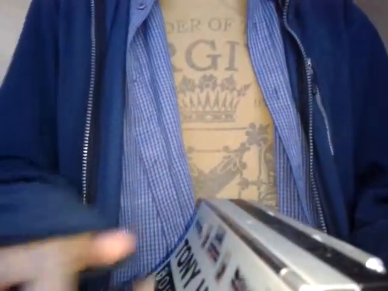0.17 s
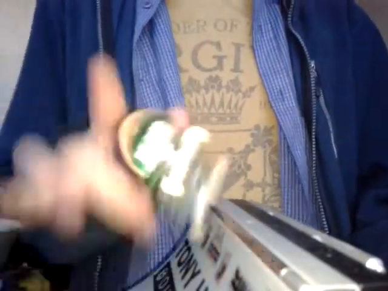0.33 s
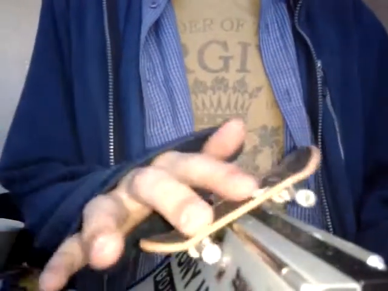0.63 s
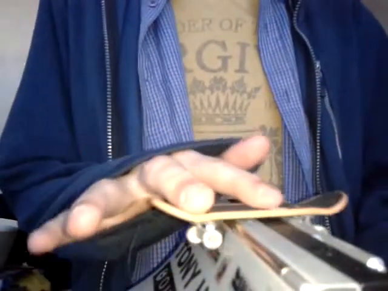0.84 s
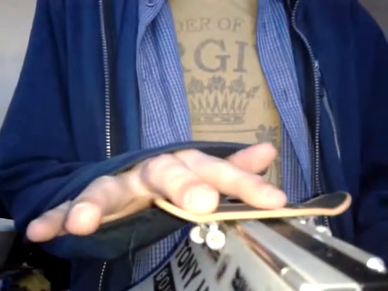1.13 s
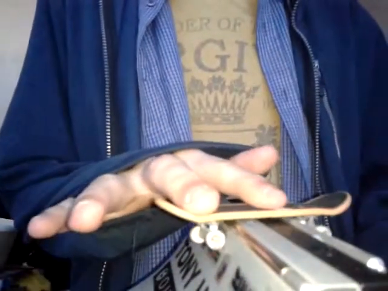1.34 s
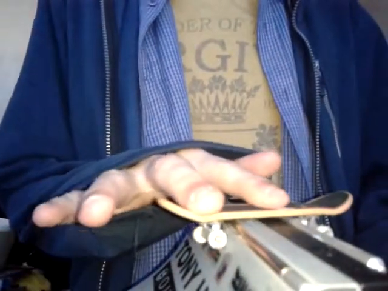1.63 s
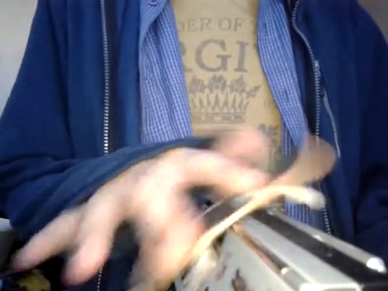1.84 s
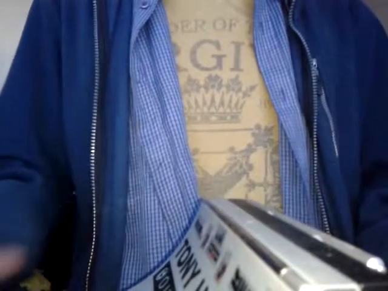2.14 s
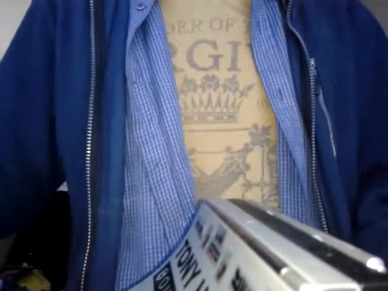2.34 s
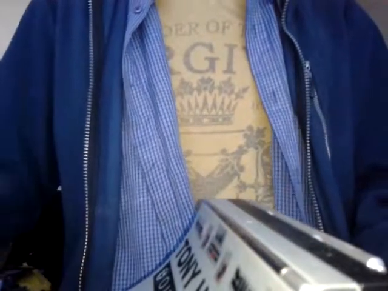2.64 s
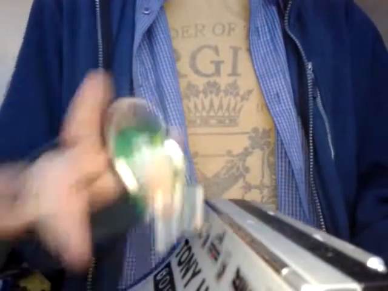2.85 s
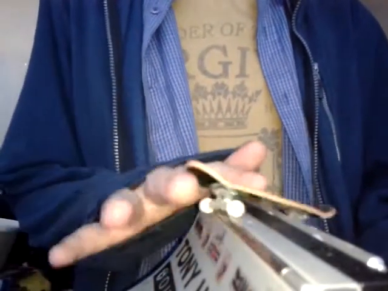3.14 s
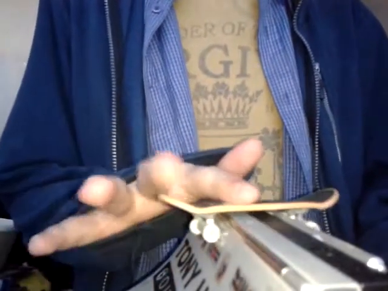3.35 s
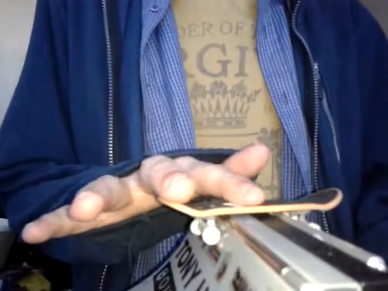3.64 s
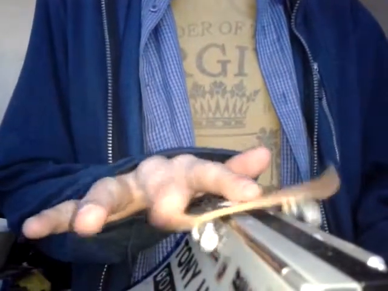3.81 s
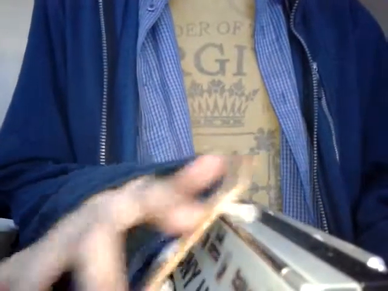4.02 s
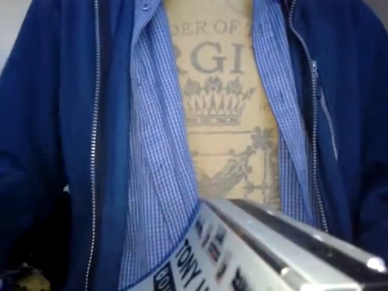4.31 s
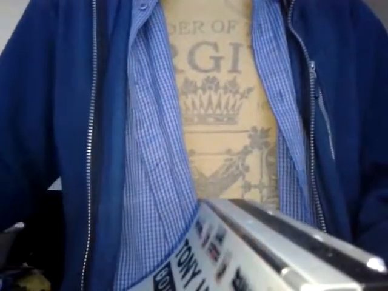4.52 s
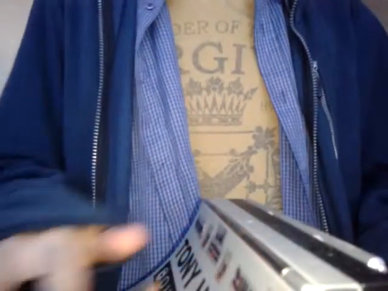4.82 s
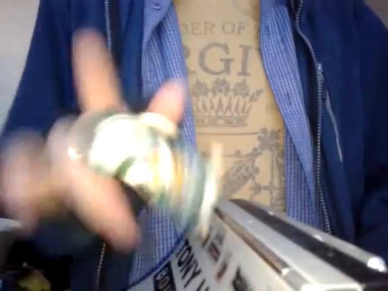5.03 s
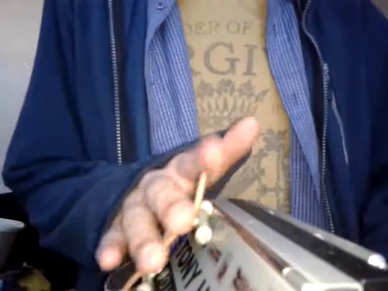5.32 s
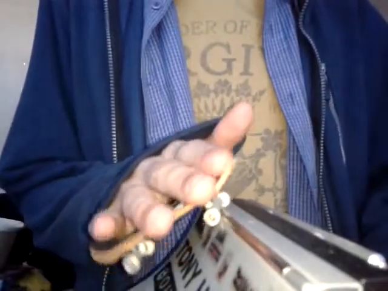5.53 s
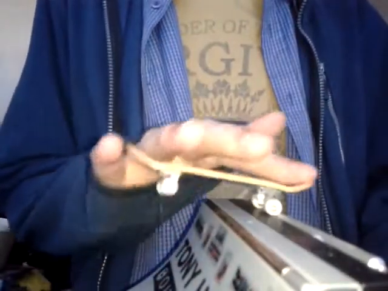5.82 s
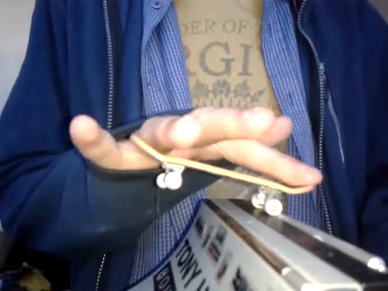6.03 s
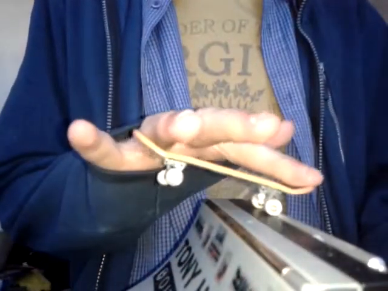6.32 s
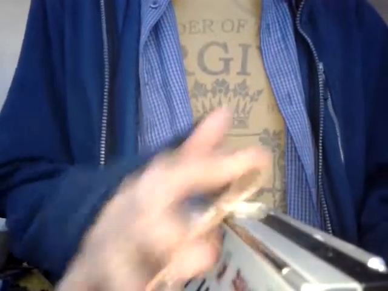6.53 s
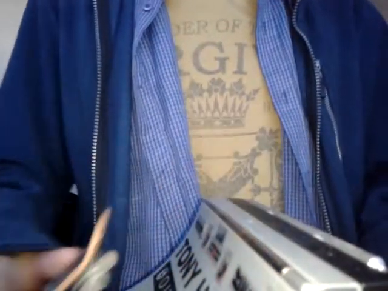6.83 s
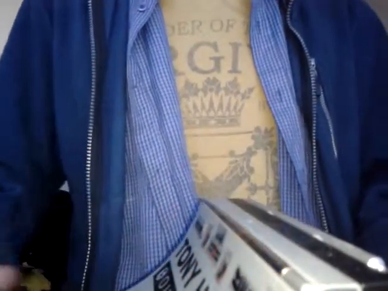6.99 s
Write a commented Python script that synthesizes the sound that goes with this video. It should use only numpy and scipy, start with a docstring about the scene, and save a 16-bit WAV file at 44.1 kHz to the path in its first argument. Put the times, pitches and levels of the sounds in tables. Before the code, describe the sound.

A finger-sized skateboard on a small hollow ramp, very close to a cheap microphone in a quiet humming room. Gritty rolling swells into hard clacks and rattles, then stops for about a second. It drops back with louder clatter and rolling, lands again, pauses briefly, and repeats. Soft ticks and scuffs mark the board being set on the lip; the loudest knocks clip.

```python
"""Over a quiet room hum, hard little wheels grind along a small hollow ramp, then clack again and again.
It is a toy skateboard pushed up and down on a table, close to a laptop microphone. Random grit makes the
ramp's modes (its natural pitches) ring; each clack is a first contact and a short rattle that rings the
same modes and the metal parts. Soft thumps, scuffs, single ticks, a singing metal lip and a deep rumble
join in. Noise echoes add the nearby surfaces, and the loudest blows overload the input."""
import sys
import numpy as np
from scipy import signal
from scipy.fft import rfft, irfft
from scipy.io import wavfile

SR = 44100
rng = np.random.default_rng(int(sys.argv[2]) if len(sys.argv) > 2 else 0)


def to_wav(sig):
    """Store sig (one row per channel, or 1-D mono) as 16-bit WAV at the path in sys.argv[1].

    Samples outside -1..1 are clipped; the rate is SR.
    """
    pcm = np.clip(np.atleast_2d(sig), -1, 1) * 32767
    pcm = np.round(pcm).astype(np.int16)
    wavfile.write(sys.argv[1], SR, pcm.T)  # frames by channels


def field_ratio(decibels):
    """Amplitude ratio for a level in dB (20 dB per decade); scalars and array-likes work."""
    return 10 ** (np.asarray(decibels, dtype=float) / 20)


N = 315756

# All event and mode levels are relative; the functions below balance them against each other.
# Noise colours: pitch_hz, relative level_db (per Hz)
ROOM_TONE_COLOUR = [(24, -40), (40, -1.5), (75, -9), (106, -6), (120, -10.5), (143, -3), (235, -7.5),
                    (334, -18), (498, -16.5), (724, -22), (1820, -27), (2230, -27), (6040, -29.5),
                    (15500, -34.5), (15900, -59.5)]
HISS_COLOUR = [(1530, -42), (2600, -15), (2850, -3), (3070, -7.5), (3720, -7.5), (4070, -8.5), (7090, -8.5),
               (9990, -21.5), (12000, -35), (16000, -102.5)]
CRACK_COLOUR = [(1530, -19.5), (2600, 2), (2910, -4), (5190, 2.5), (8380, 0), (9910, -12.5), (10300, -7),
                (14900, -17.5), (16000, -33.5)]
ROOM_TONE_DB = -59

# Deep rumble as the table is leaned on: peak_s, level_db, rise_s, fall_s
LEANS = [(2.75, -42, 0.08, 0.27), (3.5, -43, .15, 0.14), (4.54, -47, .1, 0.13), (5.13, -45, 0.081, 0.17),
         (5.35, -47, .15, 0.27), (5.65, -42, 0.296, 0.27), (6.25, -48, 0.17, 0.17),
         (6.7, -46.5, 0.088, 0.38)]
# Rolling and sliding strokes; the wheels' place on the ramp favours the modes near a gliding pitch:
# full_speed_s, level_db, rise_s, fall_s, favoured_hz
STROKES = [(0.029, -26.5, 0.15, 0.28, 595), (0.15, -18.5, 0.25, 0.2, 704.5), (0.32, -21, 0.087, 0.14, 830),
           (0.399, -18.5, 0.22, 0.024, 875), (1.935, -19, 0.049, 0.031, 1051),
           (2.069, -16.5, 0.13, 0.15, 889), (2.19, -27, 0.18, 0.077, 535), (2.3, -14.5, 0.22, 0.14, 597),
           (2.38, -23, 0.17, 0.019, 741), (2.46, -52, 0.045, 0.054, 597), (2.52, -40.5, 0.038, 0.086, 522),
           (2.635, -25, 0.11, 0.1, 540), (2.701, -24, 0.47, 0.24, 560), (2.775, -15, 0.26, 0.12, 741),
           (2.845, -13, 0.048, 0.054, 764), (2.899, -27.5, 0.028, 0.068, 762.4),
           (4.041, -26.5, 0.045, 0.13, 718), (4.135, -15, 0.12, 0.17, 1020), (4.25, -21.5, 0.15, 0.14, 513),
           (4.33, -19, 0.22, 0.22, 680), (4.413, -21, 0.21, 0.09, 807), (4.47, -31, 0.046, 0.031, 819),
           (4.575, -34, 0.015, 0.18, 593), (4.66, -24, 0.11, 0.2, 554), (4.73, -20.5, 0.19, 0.37, 700),
           (4.819, -21, 0.3, 0.13, 695), (4.93, -30.5, 0.082, 0.25, 620), (5.02, -14, 0.05, 0.083, 884),
           (6.78, -24, 0.067, 0.063, 829), (6.86, -23.5, 0.1, 0.091, 812), (6.96, -22.5, 0.2, 0.037, 730),
           (7.06, -25, 0.094, 0.12, 705), (7.15, -23.5, 0.15, .1, 704)]
# Deck and fingers scuff as the board is caught or shifted:
# full_speed_s, level_db, rise_s, fall_s, favoured_hz
SCUFFS = [(0.56, -28, 0.11, 0.2, 690), (0.7, -53, .08, 0.16, 596), (3.05, -30, 0.051, 0.18, 615),
          (3.17, -40.5, 0.066, 0.11, 671), (3.27, -34.5, 0.026, 0.073, 653), (3.33, -42, 0.084, 0.11, 654),
          (3.92, -51.5, 0.17, 0.28, 712), (5.3, -34.5, 0.16, 0.089, 662), (5.37, -39, 0.051, 0.052, 642),
          (5.5, -54.5, 0.26, 0.37, 955), (5.67, -40.5, 0.075, 0.27, 600), (5.72, -43, 0.1, 0.024, 615),
          (5.8, -49.5, 0.062, 0.14, 648), (6.639, -28.5, 0.045, 0.13, 720)]
# Wheels, axles and deck hit seams and lip: start_s, level_db, crack_db (relative to level_db), pitch_hz,
# chatter_db (strength of the rattle against the first contact)
CLACKS = [(0.121, -2.5, -13, 656, 6.5), (0.178, -7, -7.5, 800, -4.5), (0.334, -11.5, -5, 894, -5.5),
          (0.386, -6.5, -6, 724, -7), (0.488, -12, -1, 999, 3), (0.518, -24.5, -1.5, 800, 13.5),
          (0.555, -18, -15, 900, 9.5), (0.57, 2, -11.5, 1011, 2), (0.578, -4.5, -16.5, 515.4, 5),
          (0.604, 0.5, -11, 1447, -7), (0.613, -22, -17, 519, 12.5), (0.781, -18.5, -11, 492, 2.5),
          (0.792, -20.5, -37, 504, -24), (0.873, -18.5, -29, 595, -3), (1.601, -40.5, -8.5, 1150, -2),
          (1.885, -21, -26.5, 950, 13.5), (1.945, -9.5, -9, 957, 25.5), (2.001, -5.5, -14.5, 615, 3),
          (2.023, 5.5, -19.5, 910, 22), (2.139, -1, -7.5, 606, 10.5), (2.211, -1.5, -7, 1323, -4),
          (2.735, 4, -13.5, 777, -5.5), (2.748, -7, -5, 795, 7), (2.757, -5.5, -19.5, 700, 6),
          (2.782, 3.5, -13.5, 628, -10.5), (2.797, -8, -19.5, 705, 5), (2.883, -5.5, -9.5, 1440, 16.5),
          (2.895, -8, -9, 1600, 10.5), (2.98, -42.5, 10, 535, 5.5), (3.017, -4.5, -8, 690, -4),
          (3.048, -3, -4.5, 615.5, -0.5), (3.11, -11.5, 1.5, 1488, 9.5), (3.259, -31.5, -4.5, 495, 15),
          (3.295, -12, -14, 910, 21), (3.308, -9.5, -13.5, 1370, -5), (3.428, -28, -27, 555, 15),
          (3.891, -21.5, -23, 825, -8.5), (3.928, -18, -25, 523, 13), (4.043, -6.5, -6, 830, 11.5),
          (4.072, -11, -6, 1223, 4), (4.087, -9, -10, 834, 12), (4.209, 2.5, -10.5, 473, 11.5),
          (4.284, -9, -3, 502, 11), (4.762, -3, -9.5, 716, 15.5), (4.824, -2.5, -16, 838, 2),
          (5.182, -39, 11, 2300, 8.5), (5.2, 1.5, -8.5, 1386, -1), (5.211, -8.5, -9.5, 2007, 11),
          (5.226, 7, -12.5, 1209, 9.5), (5.237, -1, -16, 565, 0), (5.645, -34, -5, 770, 8),
          (5.701, -17, -8, 501, 9.5), (5.711, -16.5, -30, 522, -1), (5.755, -5.5, -20.5, 766, -1),
          (5.86, -34.5, -28, 610, -9), (6.521, -47.5, -35.5, 700, 18), (6.594, -8, -8, 606, 9.5),
          (6.614, 2, -15.5, 1112, 5.5), (6.641, -6.5, -11, 517, -7), (6.744, -17.5, -13, 1080, 10),
          (6.767, -15, -5.5, 814, -12), (6.815, -25, -7.5, 899, 12), (6.939, -5, -2, 2277, 2),
          (7.016, 3.5, -8.5, 1620, 4.5), (7.099, -14.5, 0.5, 589, 3)]
# The weight of the hand comes down through the ramp into the table: start_s, level_db, pitch_hz
THUMPS = [(0.121, -5, 310.4), (0.183, -9.5, 334), (0.338, -14, 264.5), (0.488, -13.5, 380),
          (0.571, -5, 262), (0.605, -15, 205.2), (0.793, -24.5, 366), (0.875, -30, 219),
          (0.928, -38.5, 262.3), (1.603, -43, 366), (1.882, -24.5, 164), (1.947, -14.5, 285),
          (2.001, -11.5, 264.7), (2.14, -10, 300.6), (2.212, -12, 307), (2.734, -4, 322.2),
          (2.781, -6.5, 307), (2.86, -23.5, 112.1), (3.017, -16, 355.4), (3.049, -16.5, 154.6),
          (3.112, -25, 370), (3.231, -19.5, 380), (3.306, -18, 164), (3.89, -31.5, 155.3),
          (3.929, -29, 162), (4.042, -15, 162.5), (4.084, -10, 253), (4.206, -8, 316), (4.279, -12.5, 299),
          (4.765, -7, 316), (4.822, -10, 334), (5.2, -13, 361), (5.222, -20.5, 376.7), (5.701, -17, 283),
          (5.754, -15.5, 370), (6.613, -11, 355), (6.641, -14.5, 292), (6.768, -19, 326),
          (6.936, -14.5, 366.4), (7.016, -11, 307), (7.098, -17.5, 109)]
# Clean single ticks of a wheel set down: start_s, level_db, top_hz (higher is harder), pitch_hz
TICKS = [(0.874, -37, 2406, 1316), (3.232, -17.5, 1400, 430), (3.454, -38, 3500, 630),
         (3.482, -36, 2500, 445), (3.51, -41.5, 2220, 440), (3.526, -21, 1480, 1480),
         (5.413, -26, 2460, 800), (5.482, -22, 3050, 515), (5.552, -29, 2750, 472),
         (5.587, -31.5, 1980, 520), (5.622, -32, 1800, 600)]
# A wheel rubs the metal lip: peak_s, level_db, rise_s, fall_s
LIP_RUBS = [(4.42, -32, 0.22, 0.067), (5.025, -27.5, 0.016, 0.0063), (6.9, -35, 0.072, 0.057)]

# Hollow ramp and the table under it: pitch_hz, level_db, ring_s (to fall 60 dB; each use shortens it)
RAMP_MODES = [(61, -12, 0.41), (106, -4, 0.32), (163, -9, 0.69), (216.7, -3, 0.11), (307, -1, 0.22),
              (325, 0.5, 0.2), (403, 9.5, 0.043), (522, -2, 0.13), (606, -0.5, 0.13), (724, -3.5, 0.17),
              (800, 1.5, 0.053), (999, 6, 0.039), (1230, 2.5, 0.018), (1341, 0, 0.099), (1456.5, -1, 0.1),
              (1606, 2.5, 0.044), (1747, -1.5, 0.054), (1948, 1, 0.021), (2146, -4.5, 0.086),
              (2265, -4, 0.068), (2420, -9.5, 0.036), (2820, -8.5, 0.045), (3300, -14.5, 0.027)]
# Metal parts ringing in each crack: pitch_hz, level_db (relative to the crack), ring_s (to fall 60 dB)
AXLE_MODES = [(5200, -25.5, 0.016), (5850, -15, 0.021), (6280, -17.5, .03), (8500, -21, .025),
              (9500, -24, 0.029)]
# Echo decay: pitch_hz, decay_s (to fall 60 dB)
ECHO_DECAY = [(100, .35), (420, .18), (1100, .12), (3000, .16), (7500, .17), (14000, .08)]
# Borders between the table thrum, panel and edge modes: border_hz
ZONE_BORDERS_HZ = [420, 1100]
# Each clack shares its crack differently among these bands: border_hz
CRACK_BORDERS_HZ = [1000, 3600, 6500, 10500, 17000]
# One value each for table thrum, panel, edge and wheel hiss: level_db, relative to a loud stroke
LAYER_DB = [-15.5, -2, -3.5, -15]
# Same four layers: share (plain number) of the stroke's distance from a loud stroke that each follows
SWING_SHARE = [.9, .95, 1.05, 1.45]
# Same four layers: level_db, relative to a scuff
SCUFF_DB = [-5, -2.5, -5, -11]

LOUD_STROKE_DB = -22
FADE_DB, FADE_SHAPE = 30, 1.5   # dB lost after the rise or fall time; power of time in that loss
EDGE_HZ, EDGE_FOLLOWS = 1520, 0.3   # favoured edge pitch when the panel's is 700 Hz; power of following
WANDER_DB, WANDERS_PER_S = 3.0, 22   # each mode swells and sinks as the wheels cross its nodes
# The wheels' load detunes each mode; panel modes are also drawn towards the favoured pitch.
SLIDE_OCTAVES, SLIDES_PER_S, PULL = 0.033, 9.5, 0.12
ROCK_DB, ROCK_S = -14.5, 0.043   # thrum gain against the thump; time to fall to 37 percent
THUD_DB, THUD_DB_PER_OCTAVE = -20.5, -3   # table thud against a 700 Hz clack; change per octave above it
CHATTER_RISE_S = 0.00018   # time for loose parts to join at 0 dB chatter; stronger chatter takes longer
LIP_HZ, LIP_RING_S = 792, 0.3


def at_hz(points, hz):
    """Read a pitch table, spacing pitches as the ear does (on a log scale)."""
    table = np.array(points)
    return np.interp(np.log(hz + 1), np.log(table[:, 0]), table[:, 1])


def rms_one(x):
    """Scale to an average strength (rms) of 1."""
    return x / np.sqrt(np.mean(x ** 2) + 1e-20)


def cut(x, hz, kind, order):
    """Keep the low, high or band part with a smooth Butterworth filter."""
    return signal.sosfilt(signal.butter(order, hz, kind, fs=SR, output="sos"), x)


def colour(x, spectrum):
    """Colour a sound so white input keeps its rms; minimum phase, so nothing sounds early."""
    size = 8192
    log_gain = at_hz(spectrum, np.arange(size // 2 + 1) * SR / size) * np.log(10) / 20
    cepstrum = irfft(log_gain)
    # Folding the second half onto the first gives minimum phase.
    cepstrum[1:size // 2] *= 2
    cepstrum[size // 2 + 1:] = 0
    kernel = irfft(np.exp(rfft(cepstrum)))
    return signal.oaconvolve(x, kernel / np.sqrt(np.sum(kernel ** 2)))[:N]


def drift(rate):
    """Slow random wandering of spread 1; a higher rate in Hz wanders faster."""
    r = np.exp(-2 * np.pi * rate / SR)
    noise = rng.standard_normal(N + SR)
    return rms_one(signal.lfilter([1], [1, -2 * r, r * r], noise)[SR:])   # skip the filter's start


def swells(rows):
    """Joint level in dB of events that swell and fade, adding their power."""
    t, power = np.arange(0, N + 64, 64) / SR, 1e-14
    for peak_s, level_db, rise_s, fall_s, *_ in rows:
        distance = np.abs((t - peak_s) / np.where(t < peak_s, rise_s, fall_s))
        power = power + field_ratio(2 * (level_db - FADE_DB * distance ** FADE_SHAPE))
    return np.interp(np.arange(N) / SR, t, 10 * np.log10(power))


def clicks(start_s, heights):
    """A silent track with one single-sample click per event."""
    force = np.zeros(N)
    force[np.round(start_s * SR).astype(int)] = heights
    return force


def ring(force, hz, t60):
    """A unit click starts a dying sine of height 1; well below its pitch a mode radiates little."""
    r, w = field_ratio(-60 / (t60 * SR)), 2 * np.pi * hz / SR
    rung = signal.lfilter([0, np.sin(w)], [1, -2 * r * np.cos(w), r * r], force + 1e-18)
    return cut(rung, hz * .6, "high", order=2)


def sliding_ring(force, hz, t60):
    """A mode whose pitch moves: shift the force down by the running phase, smooth, shift back."""
    turn = np.exp(2j * np.pi * np.cumsum(hz) / SR)
    smooth = signal.lfilter([1], [1, -field_ratio(-60 / (t60 * SR))], force / turn)
    return cut((smooth * turn).imag, np.mean(hz) * .6, "high", order=2)


def room_tone():
    """The steady hum of a quiet room, as coloured noise."""
    return field_ratio(ROOM_TONE_DB) * rms_one(colour(rng.standard_normal(N), ROOM_TONE_COLOUR))


def rumble():
    """Lumpy noise below the table's first mode, faint but for the leans."""
    lumps = cut(rng.standard_normal(N), 22.0, "low", order=4) * field_ratio(2.0 * drift(5.0))
    return (field_ratio(-71.0) + field_ratio(swells(LEANS))) * rms_one(cut(lumps, 8.2, "high", order=2))


def rocking():
    """The ramp rocks on the table: thrum gain that jumps at each thump and dies away."""
    start_s, level_db, _ = np.transpose(THUMPS)
    jolts = clicks(start_s, field_ratio(level_db + ROCK_DB))
    return signal.lfilter([1], [1, -np.exp(-1 / (ROCK_S * SR))], jolts + 1e-18)


def roll_controls():
    """Stroke and scuff levels set the four layer gains; their places set the favoured pitch."""
    from_loud_db, scuff_db = swells(STROKES) - LOUD_STROKE_DB, swells(SCUFFS)
    gains = []
    for layer_db, swing, share_db in zip(LAYER_DB, SWING_SHARE, SCUFF_DB):
        stroke_gain = field_ratio(LOUD_STROKE_DB + layer_db + swing * from_loud_db)
        gains.append(np.hypot(stroke_gain, field_ratio(scuff_db + share_db)))
    gains[0] = np.hypot(gains[0], rocking())
    places = np.array(sorted(STROKES + SCUFFS))
    return np.array(gains), np.interp(np.arange(N) / SR, places[:, 0], places[:, -1])


def grit(per_s, spread_db, bumpy_db, bumps_per_s):
    """Wheels meet surface grains at random; their out-of-roundness makes the pressure bump."""
    sizes = field_ratio(spread_db * np.minimum(rng.exponential(1, N), 5)) * rng.choice([-1, 1], N)
    hits = rng.random(N) < per_s / SR
    return rms_one(sizes * hits * field_ratio(bumpy_db * drift(bumps_per_s)))


def rolling(gains, favoured_hz):
    """Grit drives the ramp's modes, most strongly those near the favoured pitch."""
    grains = [grit(5500, spread_db=3.1, bumpy_db=3.2, bumps_per_s=79.0) for _ in range(2)]
    edge_hz = EDGE_HZ * (favoured_hz / 700) ** EDGE_FOLLOWS
    rolled, power = np.zeros((3, N)), np.zeros((3, N))
    for k, (hz, level_db, t60) in enumerate(RAMP_MODES):
        zone = np.searchsorted(ZONE_BORDERS_HZ, hz)   # 0 table thrum, 1 panel, 2 edge
        # The table thrum has no favoured pitch and does not slide.
        octaves = np.log2(hz / (favoured_hz if zone < 2 else edge_hz)) * (zone > 0)
        slide = SLIDE_OCTAVES * drift(SLIDES_PER_S) * (zone > 0) - PULL * octaves * (zone == 1)
        weight = field_ratio(level_db - 12.0 * np.abs(octaves) + WANDER_DB * drift(WANDERS_PER_S))
        rolled[zone] += weight * rms_one(sliding_ring(grains[k % 2], hz * 2 ** slide, t60 * .55))
        power[zone] += weight ** 2
    return np.sum(gains * rolled / np.sqrt(power), axis=0)


def wheel_hiss(gain):
    """Fine, dense grit under the wheels gives a bright hiss."""
    return gain * colour(grit(12000, spread_db=2.7, bumpy_db=2.3, bumps_per_s=45.0), HISS_COLOUR)


def rattles(level_db, scatter_db, density, dying_ms, first):
    """Each clack is a first contact and a dying chatter of loose parts, with fresh strength per call."""
    force, t = np.zeros(N + 2048), np.arange(2048) / SR
    draws = rng.standard_normal((len(CLACKS), 2049))
    for (start_s, *_, chatter_db), clack_db, draw in zip(CLACKS, level_db, draws):
        hits = draw[1:] * (np.abs(draw[:0:-1]) < density)   # a random few samples are hits
        joining = np.tanh(t / (CHATTER_RISE_S * field_ratio(chatter_db)))
        blow = hits * np.exp(-1000 * t / dying_ms) * joining
        blow *= field_ratio(chatter_db) / np.sqrt(np.sum(blow ** 2))
        blow[0] = first
        blow /= np.sqrt(np.sum(blow ** 2))
        at = round(start_s * SR)
        force[at:at + 2048] += field_ratio(clack_db + scatter_db * draw[0]) * blow
    return force[:N]


def ramp_clacks():
    """Rattling blows ring the ramp's modes, favouring those near each clack's pitch."""
    _, level_db, _, pitch_hz, _ = np.transpose(CLACKS)
    thud_db = THUD_DB + THUD_DB_PER_OCTAVE * np.log2(pitch_hz / 700)
    struck = np.zeros(N)
    for k, (hz, mode_db, t60) in enumerate(RAMP_MODES):
        is_table = hz <= ZONE_BORDERS_HZ[0]
        share_db = thud_db if is_table else -5.0 * np.abs(np.log2(hz / pitch_hz))
        blows = rattles(level_db + share_db - 8.0, scatter_db=2.5, density=0.1, dying_ms=7.0, first=0.58)
        struck += (-1) ** k * field_ratio(mode_db) * ring(blows, hz, t60 * 0.28)   # neighbours alternate in sign
    return struck


def metal_cracks():
    """Axles and lip give each clack a bright burst of noise and short metal rings."""
    _, level_db, crack_db, *_ = np.transpose(CLACKS)
    crack_level_db = level_db + crack_db
    blows = 0
    for band in zip(CRACK_BORDERS_HZ, CRACK_BORDERS_HZ[1:]):
        force = rattles(crack_level_db + 17.5, scatter_db=3.5, density=.6, dying_ms=7.1, first=0.65)
        blows = blows + cut(force, band, "band", order=2)
    metal = 0
    for hz, db, t60 in AXLE_MODES:
        force = rattles(crack_level_db + db, scatter_db=6.5, density=0.12, dying_ms=2.3, first=.7)
        metal = metal + ring(force, hz, t60)
    return colour(blows, CRACK_COLOUR) + metal


def knocks():
    """The first contact itself, a blunt pulse heard best where little chatter follows."""
    start_s, level_db, *_, chatter_db = np.transpose(CLACKS)
    force = clicks(start_s, field_ratio(level_db + 9.0) / np.sqrt(1 + field_ratio(2 * chatter_db)))
    return cut(cut(force, 2800, "low", order=2), 250, "high", order=1)


def thumps():
    """A soft push rings only the low modes of ramp and table, most those near its pitch."""
    start_s, level_db, pitch_hz = np.transpose(THUMPS)
    out = np.zeros(N)
    for k, (hz, mode_db, t60) in enumerate(RAMP_MODES):
        if hz < ZONE_BORDERS_HZ[0]:
            scatter_db = rng.normal(0, 1.5, len(start_s))
            share_db = -5.8 * np.abs(np.log2(hz / pitch_hz))
            force = clicks(start_s, field_ratio(level_db + mode_db - 1.0 + share_db + scatter_db))
            out += (-1) ** k * ring(force, hz, t60 * 0.26)
    return out


def ticks():
    """A wheel set down makes a blunt pulse and a short ring of the modes near the tick's pitch."""
    out = np.zeros(N)
    for start_s, level_db, top_hz, pitch_hz in TICKS:
        force, at = np.zeros(4096), round(start_s * SR)
        force[0] = field_ratio(level_db)
        rings = 0
        for k, (hz, mode_db, t60) in enumerate(RAMP_MODES[4:]):   # skip the four lowest modes
            share = field_ratio(mode_db - 6.8 * abs(np.log2(hz / pitch_hz)))
            rings = rings + (-1) ** k * share * ring(force, hz, t60 * 0.15)
        pulse = cut(force, 160.0, "high", order=1) * SR / (2 * top_hz)   # softer ticks last longer
        out[at:at + 4096] += cut(field_ratio(-0.5) * pulse + field_ratio(0.5) * rings, 1.11 * top_hz, "low", order=4)
    return out


def lip():
    """Rubbing noise drives the lip's one long mode, which rings on after the wheel has left."""
    noise = rng.standard_normal(N)
    gain = 1 / np.std(ring(noise, LIP_HZ, LIP_RING_S))
    return gain * ring(noise * field_ratio(swells(LIP_RUBS)), LIP_HZ, LIP_RING_S)


def room(x):
    """Close reflections from table, screen and body: octaves of noise, each dying at its own rate."""
    t, tail = np.arange(SR // 2) / SR, 0
    for low_hz in 40 * 2. ** np.arange(9):
        band = [low_hz, min(2 * low_hz, .45 * SR)]
        noise = cut(rng.standard_normal(len(t)), band, "band", order=2)
        tail = tail + noise * field_ratio(-60 * t / at_hz(ECHO_DECAY, low_hz * np.sqrt(2)))
    late = tail * (t > .002)   # no echo in the first 2 ms
    return signal.oaconvolve(x, late / np.sqrt(np.sum(tail ** 2)))[:N]


def scene():
    """Board and ramp with their reflections over the room tone and rumble."""
    gains, favoured_hz = roll_controls()
    body = rolling(gains[:3], favoured_hz) + ramp_clacks()
    body = cut(body, 4600.0, "low", order=2)   # soft plastic passes little treble
    low_parts = cut(body + knocks() + thumps() + ticks(), 50.0, "high", order=2)
    board = low_parts + wheel_hiss(gains[3]) + metal_cracks() + lip()
    return (field_ratio(0.5) * board + field_ratio(-8.0) * room(board) + room_tone() + rumble())[None]


def roll_off(x):
    """The treble ends steeply here."""
    return signal.sosfilt(signal.butter(12, 16830, fs=SR, output="sos"), x)


def record(dry):
    """The input overloads almost like a hard clip, then the top is cut."""
    limit = .7   # of full scale
    x = dry / limit
    clipped = limit * x / (1 + x ** 16) ** (1 / 16)
    mix = cut(clipped, 16000, "low", order=8)
    return roll_off(mix)


dry = scene()
out = record(dry)
to_wav(out)
```